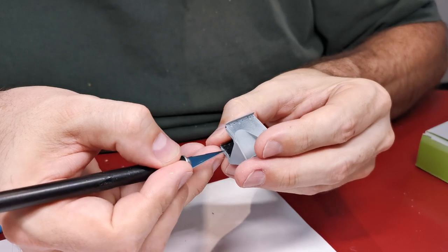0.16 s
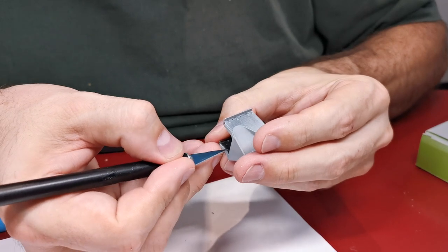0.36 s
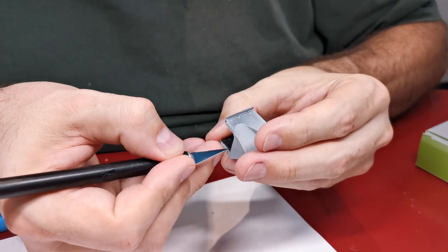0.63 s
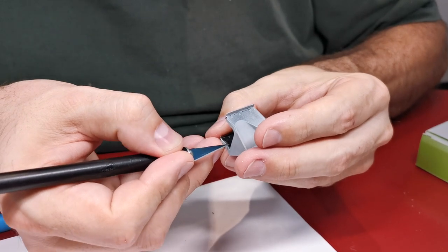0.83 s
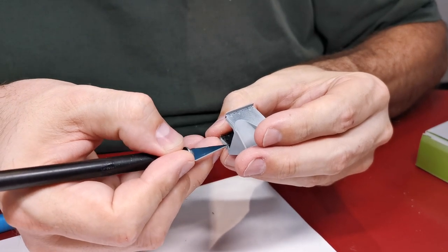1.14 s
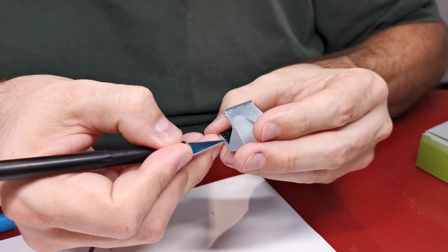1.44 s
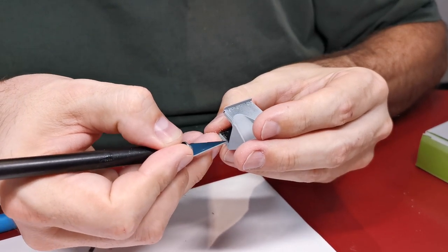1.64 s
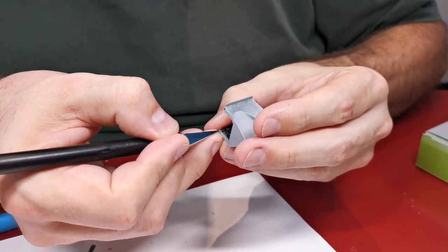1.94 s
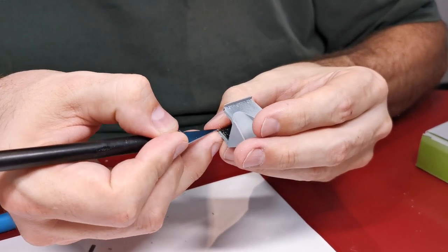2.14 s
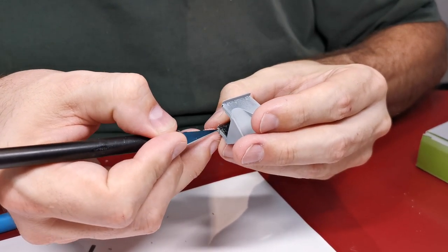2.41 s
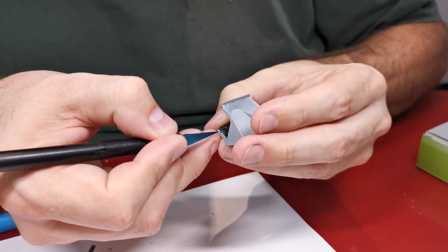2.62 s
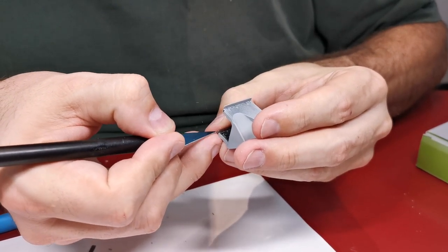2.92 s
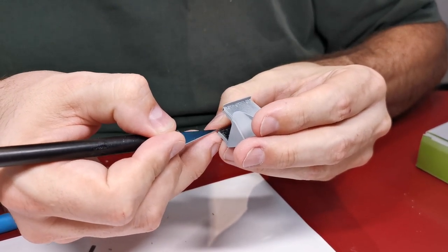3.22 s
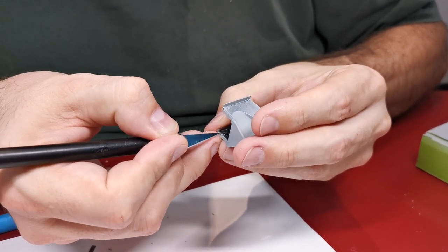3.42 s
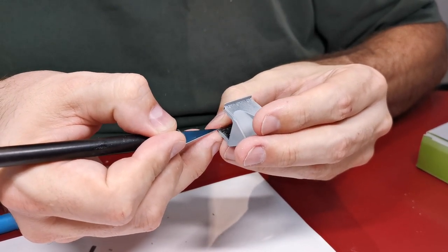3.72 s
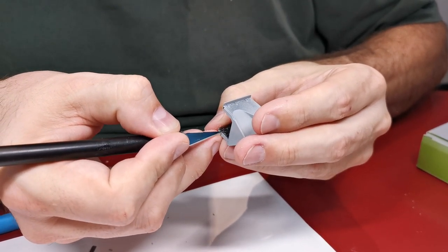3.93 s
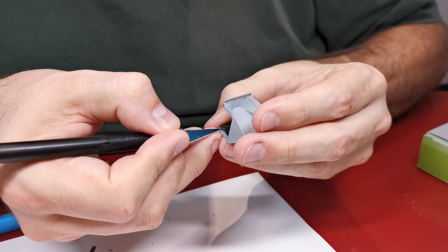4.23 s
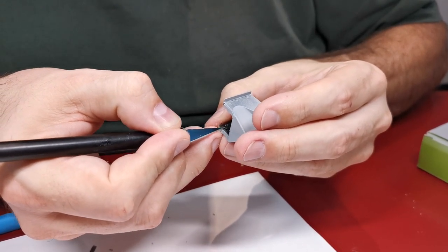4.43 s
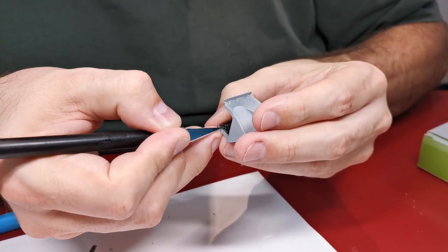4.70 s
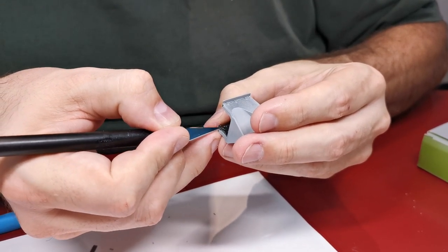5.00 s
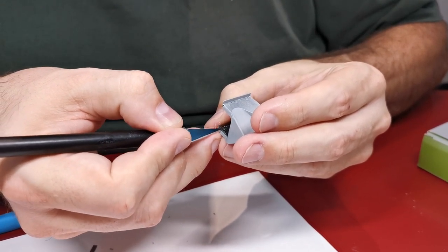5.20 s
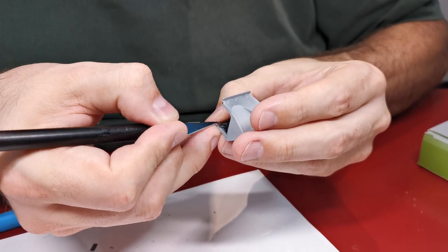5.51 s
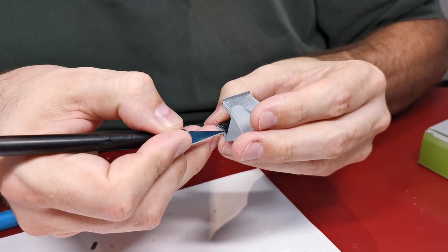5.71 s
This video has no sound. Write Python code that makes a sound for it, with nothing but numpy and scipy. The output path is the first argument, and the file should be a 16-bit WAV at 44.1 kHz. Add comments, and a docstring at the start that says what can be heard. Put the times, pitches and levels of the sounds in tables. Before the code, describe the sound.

Quick dry rasps and clicks of a blade catching along a plastic edge, with short pauses, over soft rumble and faint hiss.

```python
"""Knife scraping a plastic part

A hobby knife scrapes the edge of a small plastic part in quick strokes, close to the left microphone.
In each stroke the blade sticks and slips at a nearly even pace: noisy snaps with short chatter ring the
resonances of part and blade, clumps of tiny tears rasp in between, and the last slip knocks hardest.
Single contacts, some alone and some at the edge of a stroke, add a ring of the knife and a dull push.
Decaying noise tails make a small live room, over soft rumble, hiss and a faint mains hum of sines."""
import sys
import numpy as np
from scipy import signal
from scipy.fft import rfft, irfft, next_fast_len
from scipy.io import wavfile
from scipy.ndimage import map_coordinates

SR = 44100
rng = np.random.default_rng(int(sys.argv[2]) if len(sys.argv) > 2 else 0)


def transcribe(u):
    """Save the signal u as a 16-bit wav file named by the first command-line argument.

    u: samples, shape (n,) or (channels, n), limited to [-1, 1]; the rate is SR.
    q: integer samples, one column per channel.
    """
    v = np.clip(np.atleast_2d(u).T, -1, 1)
    q = np.round(v * 32767).astype(np.int16)
    wavfile.write(sys.argv[1], SR, q)


N = 258062
TIME = np.arange(N) / SR
TOP_HZ = 15900
SLIP_SIZE = 1024  # samples held for one contact

# Room air, relative spectrum: freq_hz, density_db
AIR_SPECTRUM = [(25, -1.5), (60, 0), (130, -2), (160, -3.5), (220, 0.5), (400, -7), (700, -13),
                (1200, -15.5), (2000, -16.5), (3200, -23), (5500, -24.5), (7800, -29.5), (9500, -42),
                (15000, -44)]
# Left-right correlation of the room air: freq_hz, correlation (0 to 1)
AIR_CORRELATION = [(30, 0.23), (120, 0.53), (300, 0.72), (800, 0.58), (4000, 0.11)]
# Swells of the low rumble: centre_s, half_width_s (to 1/e), rise_db
RUMBLE_SWELLS = [(0, .05, 7), (.31, .13, 7), (.63, .07, 5), (1.4, .2, 4.5), (2.46, .26, 7), (3.6, .12, 5),
                 (3.92, .08, 3)]
# Mains hum partials before the stereo tilt: freq_hz, level_db
HUM_PARTIALS = [(120, -78.5), (240, -91), (360, -92)]

# Strokes that bite, slip along the edge and drop away; one that stalls and bites again has two rows.
# Relative levels: start_s, end_s, nominal_slips_per_s, bite_db, slips_db, drop_db, chatter_re_snap_db,
# shavings_db, low_resonance_weight_db, base_contact_pitch_hz, knock_db
STROKES = [ (0.0352, 0.0849, 100, -20, -21.5, -24, -7.5, -34, 2.5, 7200, -49),
           (0.4516, 0.4652, 147, -24, -17.5, -22, -10, -34, -4.5, 7100, -56),
           (0.6895, 0.7583, 72, -20.5, -21.3, -25.5, -2, -38.5, -1.5, 7150, -53),
           (0.9876, 0.9958, 240, -26, -23.5, -25.5, -2, -37, 1, 6750, -54),
           (1.0135, 1.0452, 95, -26, -24.5, -23, -3.5, -39, 3, 6500, -40),
           (1.2197, 1.2345, 68, -27.5, -27, -22.5, -2, -39, 2, 7200, -52),
           (1.2525, 1.2835, 97, -27, -23.5, -24, -3, -36, -1.5, 7000, -35.5),
           (1.4826, 1.505, 140, -21.5, -30, -33, -1, -30.5, -4.5, 7000, -46),
           (1.5228, 1.549, 76, -25.5, -29, -26.5, -4, -32, -1, 6750, -38),
           (1.7042, 1.7135, 215, -30, -28, -27, 0, -33, -4, 7100, -54),
           (1.725, 1.7381, 230, -27.5, -30, -31, 0, -36, -3.5, 7050, -52),
           (1.7572, 1.7801, 87, -27, -42, -28.5, -2, -37, -1, 6650, -43),
           (1.9258, 1.9698, 136, -23.5, -30, -25, -3, -36.5, -1, 6700, -39),
           (2.1413, 2.1552, 70, -32, -32, -28, -6, -34.5, 3, 7000, -35),
           (2.912, 2.9175, 180, -27, -27, -25.5, -9, -39, -2, 6350, -41),
           (3.2389, 3.2548, 125, -27, -26, -23.5, -7, -38, -4, 6700, -53),
           (3.7045, 3.7205, 125, -30, -22, -21.5, -5.5, -37, -3.5, 6950, -51),
           (3.7315, 3.7387, 139, -21, -25, -26, -8, -35, -1, 6450, -49),
           (4.0322, 4.0466, 70, -30, -30, -25, -6, -45, -1.5, 6950, -50),
           (4.2853, 4.318, 120, -29, -34.5, -35, -5, -35, 1.5, 6400, -48),
           (4.54, 4.5425, 400, -32, -32, -33, -6, -34, 6, 6650, -60),
           (4.5665, 4.5881, 92, -26.5, -26, -33, -5, -38, -7, 6850, -56),
           (4.7635, 4.7725, 220, -40, -30.5, -30, -5, -41, 1, 6450, -60),
           (4.794, 4.8232, 170, -32, -29.5, -26.5, -4, -38, 1, 6100, -46),
           (5.0384, 5.0425, 245, -27, -27, -27.5, -2, -37, 0, 6300, -54),
           (5.0554, 5.079, 127, -33, -32.5, -24.5, -7, -36.5, 5, 5750, -48),
           (5.2802, 5.2862, 165, -25.5, -32, -32, 0, -35, 1, 6850, -46),
           (5.302, 5.3223, 148, -33, -33, -32, -2, -34.5, 5, 6700, -37),
           (5.4864, 5.519, 153, -21, -30.5, -35, -6, -34.5, 2, 6400, -37)]
# Single contacts, some alone and some at the edge of a stroke, relative levels:
# start_s, snap_db, low_resonance_weight_db, contact_pitch_hz, knock_db
SINGLE_CONTACTS = [(0.477, -30, 4, 7100, -50), (0.7624, -21, -1, 5700, -42), (1.2143, -32.5, 2, 6200, -58),
                   (2.6172, -37, -1, 7000, -66), (2.8758, -16.3, -9, 7100, -39.5),
                   (2.9073, -22, -1, 6850, -44), (2.9835, -34.5, -2, 6000, -62),
                   (3.672, -22.5, -1.5, 7250, -62), (3.9813, -15.5, -7, 7150, -44),
                   (4.2681, -25.5, -3.5, 6950, -53), (4.5212, -25.7, -.5, 6700, -60),
                   (5.4535, -35.5, 9, 6600, -44), (5.482, -30.5, 9, 6600, -54), (5.564, -35, -1, 6200, -56)]
# Resonances of part and blade at neutral grip: freq_hz, width_hz, lift_db
RESONANCES = [(1280, 320, 4), (1845, 330, 6.5), (2704, 344, 3.5), (3365, 310, 6), (4120, 350, 2.5),
              (5310, 340, 5), (5950, 250, 4), (6630, 330, 1), (7150, 220, 2.5), (7630, 200, 2),
              (8040, 270, 1)]
# Broad colour of a slip: freq_hz, relative_db
SCRAPE_COLOUR = [(100, -47), (800, -39), (1300, -30.5), (2050, -18.3), (2600, -7), (4600, -7), (6200, -3.5),
                 (7700, -1), (8700, -7.5), (9500, -17), (10300, -27.5), (11500, -24), (13600, -26),
                 (15200, -37.5)]
# Lowest modes of the part, damped by the fingers, before random spread: freq_hz, relative_db, t60_s
PART_MODES = [(900, -30, .008), (1292, -5.5, 0.014), (1500, -9, .01), (1844, 1, .013)]

# Direct sound, stereo balance: freq_hz, left_minus_right_db
DIRECT_BALANCE = [(700, 9.5), (1250, 1.5), (1850, -4.5), (2500, 14.5), (4000, 17.5), (5200, 8.5),
                  (7000, 12), (7900, 4.5), (8700, 6.5), (10500, 2.5), (15000, 0.5)]
# Phase offset between the two microphone ports: freq_hz, left_lead_rad
PORT_PHASE = [(1000, 0.94), (2200, 0.05), (3400, -0.55), (4100, 2.27), (5200, 1.7), (5800, -0.9),
              (6400, -0.8), (7900, -.5), (8600, 1.6), (9800, 2.5), (11000, 3), (11800, 0.5), (12900, -1.5),
              (14000, -1)]
# Shading of the right microphone by the moving hands: time_s, gain_db
HAND_SHADE = [(0, -.5), (.45, .5), (.75, -1.3), (1.25, -1), (1.5, 2), (2.15, 3.3), (2.9, 2.5), (3.25, -2.5),
              (3.7, -1.7), (4, 1.5), (4.3, 1), (4.55, -1.5), (4.8, -3.8), (5.5, -2.3)]
# Decay of the room tail: freq_hz, t60_s
ROOM_T60 = [(300, 0.05), (1000, 0.5157), (2600, 0.5059), (5500, 0.54), (7500, 0.4371), (13000, 0.42)]
# Tone of the room tail: freq_hz, relative_db
ROOM_COLOUR = [(500, -3.5), (1500, 2.5), (2200, 1.5), (3300, -5.5), (4700, 0), (5900, -2.5), (7000, -4.8),
               (8300, -2.8), (12000, -2.5)]
# Room tail, stereo balance: freq_hz, left_minus_right_db
ROOM_BALANCE = [(1000, -0.5), (1800, 3), (2500, 6.5), (6000, 11), (7300, 4), (8200, 1), (13000, 3.5)]

# How the slips of one stroke differ (standard deviations)
SLIP_JITTER_S, SLIP_SPREAD_DB, WEIGHT_SPREAD_DB = .0005, 1.5, 1.5
# The contact falls in pitch along the stroke, then sits lower as the blade drops off
CONTACT_SAG_HZ, DROP_SAG_HZ = 200, 450
KNOCK_RISE_DB = 13  # knocks grow as the blade nears the end of the edge
RUN_IN_S, RUN_OUT_S = .002, .005  # the edge drags just before the bite and just after the drop
SINGLE_FOCUS_DB, SLIP_FOCUS_DB = 6.5, 5  # lift of the contact resonance
SINGLE_CHATTER_DB = -11  # relative to the snap: a single contact chatters little
HARD_SNAP_DB = -16  # snap level of a hard single contact
KNIFE_HZ, RING_DB, THUD_DB = 2680, -20.5, -14.5  # ring and push amplitude at that hardness
RING_GROWTH, THUD_GROWTH = 1.8, 2.4  # dB of ring and of thud per dB of snap


def amp(db):
    """Decibels to gain."""
    return 10 ** (np.asarray(db) / 20)


def unit(x):
    """Scale to rms 1."""
    return x / np.sqrt(np.mean(x ** 2) + 1e-20)


def along(points, hz):
    """Read a (freq_hz, value) curve on a log frequency axis."""
    freqs, values = np.transpose(points)
    return np.interp(np.log(hz + 1), np.log(freqs), values)


def wobble(rate):
    """A smooth random curve with rate knots a second."""
    knots = rng.standard_normal(int(N * rate / SR) + 4)
    return map_coordinates(knots, [TIME * rate])


def filtered(x, response):
    """Multiply the spectrum of x by a response of frequency."""
    size = 2 * next_fast_len(N // 2 + SR // 4)
    hz = np.fft.rfftfreq(size, 1 / SR)
    return irfft(rfft(x, size) * response(hz), size)[..., :N]


def causal(db):
    """Minimum-phase response with these gains, so it rings only after its cause."""
    cepstrum = irfft(db * np.log(10) / 20)
    half = cepstrum.shape[-1] // 2
    cepstrum[..., 1:half] *= 2
    cepstrum[..., half + 1:] = 0
    return np.exp(rfft(cepstrum))


def ports(balance, hz):
    """Left and right gains in dB that keep the mean power."""
    ratio = amp(along(balance, hz)) ** 2
    powers = 2 * np.array([ratio, np.ones_like(ratio)]) / (1 + ratio)
    return 10 * np.log10(powers)


def ring(hz, t60, attack_s=0.00046):
    """One struck mode: a sine with a quick attack, dying away exponentially."""
    t = np.arange(SLIP_SIZE) / SR
    decay = np.exp(-np.log(1000) * t / t60)
    return np.sin(2 * np.pi * hz * t) * decay * (1 - np.exp(-t / attack_s))


def part(hz, weight_db, contact_hz=6700, grip=1, body_hz=3350, body_octaves=.62,
         contact_width_hz=900, contact_db=5):
    """Part and blade at unit power: grip shifts their resonances, the contact adds a broad one."""
    octaves = np.log2((hz + 1) / body_hz)
    db = along(SCRAPE_COLOUR, hz) + weight_db * np.exp(-(octaves / body_octaves) ** 4)
    db = db + contact_db * np.exp(-((hz - contact_hz) / contact_width_hz) ** 2)
    for centre, width, lift in RESONANCES:
        db = db + lift / (1 + (2 * (hz - centre * grip) / width) ** 2)
    response = causal(db)
    return response / np.sqrt(np.mean(abs(response) ** 2, axis=-1, keepdims=True))


def background(hiss_db=-74, rumble_db=-72.5, sway_db=1.2, split_hz=560):
    """Noise of partly correlated sides: steady hiss above, swaying rumble and hum below."""
    def mid_side(hz):
        turn = np.arccos(np.clip(along(AIR_CORRELATION, hz), -1, 1)) / 2
        return amp(along(AIR_SPECTRUM, hz)) * [np.cos(turn), np.sin(turn)]

    mid, side = filtered(rng.standard_normal((2, N)), mid_side)
    air = np.array([mid + side, mid - side])
    low = filtered(air, lambda hz: 1 / (1 + (hz / split_hz) ** 4))
    swell_db = sum(db * np.exp(-((TIME - s) / width) ** 2) for s, width, db in RUMBLE_SWELLS)
    rumble = unit(low) * amp(rumble_db + swell_db + sway_db * wobble(9))
    tilt = amp([[-.7], [.7]])  # dB, left and right
    return tilt * (rumble + mains()) + amp(hiss_db) * unit(air - low)


def mains(waver_db=1.8):
    """Faint hum: sine partials, each slowly wavering in level."""
    hum = 0
    for hz, db in HUM_PARTIALS:
        level = amp(db + waver_db * wobble(3)) * np.sqrt(2)  # rms to peak
        hum = hum + level * np.sin(2 * np.pi * hz * TIME)
    return hum


def stick_slip():
    """The blade grips and lets go at a nearly even pace, bite to drop.

    Rows: time_s, snap_db, chatter_re_snap_db, weight_db, contact_hz, focus_db, knock_db.
    """
    rows = []
    for (start, end, pace, bite_db, slip_db, drop_db, chatter_db, _,
         weight_db, contact_hz, knock_db) in STROKES:
        late, louder, heavier = rng.standard_normal(size=(3, 16))
        steps = int(np.clip(round((end - start) * pace), 1, len(late)))
        rows.append((start, bite_db, chatter_db, weight_db, contact_hz + CONTACT_SAG_HZ / 2,
                     SLIP_FOCUS_DB, knock_db - KNOCK_RISE_DB))
        for k in range(1, steps):
            way = k / steps  # 0 at the bite, 1 at the drop
            time_s = start + way * (end - start) + SLIP_JITTER_S * late[k]
            rows.append((time_s, slip_db + SLIP_SPREAD_DB * louder[k], chatter_db,
                         weight_db + WEIGHT_SPREAD_DB * heavier[k],
                         contact_hz + CONTACT_SAG_HZ * (.5 - way),
                         SLIP_FOCUS_DB, knock_db - KNOCK_RISE_DB * (1 - way)))
        rows.append((end, drop_db, chatter_db, weight_db, contact_hz - DROP_SAG_HZ,
                     SLIP_FOCUS_DB, knock_db))
    return rows


def snaps(contacts, grit=.42, fade_in_s=.00022, snap_s=0.00055, chatter_s=.0022,
          chatter_rise_s=0.0017, grip_spread=.012, snap_db=-3, chatter_db=-3):
    """Each slip or single contact is a sharp noisy snap, then milliseconds of chatter."""
    lead = SR // 1000  # room for the noise to fade in ahead of the peak
    hz = np.fft.rfftfreq(SLIP_SIZE, 1 / SR)
    t = (np.arange(SLIP_SIZE) - lead) / SR
    before, after = np.maximum(-t, 0), np.maximum(t, 0)
    grit_fade = np.exp(-before / fade_in_s - after / snap_s)
    chatter_fade = (1 - np.exp(-(after / chatter_rise_s) ** 2)) * np.exp(-after / chatter_s)
    snap_samples = .002 * SR  # levels are referred to 2 ms of sound
    out = np.zeros(N + SR)
    for s, db, rasp_db, weight_db, contact_hz, focus_db, _ in contacts:
        grip = 1 + grip_spread * rng.standard_normal()
        body = part(hz, weight_db, contact_hz, grip, contact_db=focus_db)
        burst = (t == 0) + grit * rng.standard_normal(SLIP_SIZE) * grit_fade
        chatter = rng.standard_normal(SLIP_SIZE) ** 3 * chatter_fade  # cubed: sparse, spiky noise
        snap = irfft(rfft(burst) * body)
        rasp = irfft(rfft(chatter) * body)
        sound = amp(snap_db) * snap / np.linalg.norm(snap)
        sound = sound + amp(rasp_db + chatter_db) * rasp / np.linalg.norm(rasp)
        out[round(s * SR) - lead:][:SLIP_SIZE] += amp(db) * np.sqrt(snap_samples) * sound
    return out[:N]


def shaving(tears_per_s=2500, size_spread_db=4, clump_db=4, weight_db=1, level_db=-7, ramp_s=.0011):
    """While the edge drags, tiny tears come in clumps and excite the resonances of part and blade."""
    pressure = 0
    for start, end, *_, shavings_db, _, _, _ in STROKES:
        to_edge_s = np.minimum(TIME - start + RUN_IN_S, end + RUN_OUT_S - TIME)
        pressure = pressure + amp(shavings_db) * np.clip(to_edge_s / ramp_s, 0, 1)
    sizes = amp(size_spread_db * rng.standard_normal(N) + clump_db * wobble(300))
    torn = rng.random(N) < tears_per_s / SR
    tears = torn * sizes * rng.choice([-1, 1], N)
    return amp(level_db) * filtered(unit(tears) * pressure, lambda hz: part(hz, weight_db))


def knocks(contacts, level_db=-1, pitch_spread=.025):
    """Every contact briefly rings the part's lowest modes, which move with the grip."""
    out = np.zeros(N + SR)
    for s, *_, knock_db in contacts:
        modes = 0
        for hz, level, t60 in PART_MODES:
            gain = amp(level + rng.normal(0, 1.5))
            modes = modes + gain * ring(hz * rng.normal(1, pitch_spread), t60)
        out[round(s * SR):][:SLIP_SIZE] += amp(knock_db + level_db) * modes
    return out[:N]


def nearby(x, scatter_s=.0012, left_db=-14, right_db=-8, delay_s=.0125, echo_db=-21):
    """The hands scatter sound differently to each microphone; a near surface sends one weak echo."""
    t = np.arange(SLIP_SIZE) / SR
    scatter = rng.standard_normal((2, SLIP_SIZE)) * t * np.exp(-t / scatter_s)
    scatter = scatter / np.linalg.norm(scatter, axis=1, keepdims=True)
    paths = amp([[left_db], [right_db]]) * scatter
    paths[:, round(delay_s * SR)] += amp(echo_db)
    return signal.fftconvolve(x, paths, axes=1)[:, :N]


def room(x, build_s=0.0037, wet_db=-6.5):
    """A diffuse noise tail decays at its own rate in each band, redrawn every quarter second."""
    out = np.zeros((2, N + SR))
    size = SR // 4
    for start in range(0, N, size):
        hz, t, z = signal.stft(rng.standard_normal((2, SR * 2 // 3)), SR, nperseg=256)
        fade = amp(-60 * t / along(ROOM_T60, hz)[:, None])
        build = 1 - np.exp(-(t / build_s) ** 2)
        tail = signal.istft(z * fade * build, SR, nperseg=256)[1]
        tail = tail / np.linalg.norm(tail[0])
        wet = signal.fftconvolve(x[None, start:start + size], tail, axes=1)
        out[:, start:start + wet.shape[1]] += wet
    return amp(wet_db) * filtered(
        out[:, :N], lambda hz: amp(along(ROOM_COLOUR, hz) + ports(ROOM_BALANCE, hz)))


def single_contacts():
    """Contacts alone or at the edge of a stroke: one snap with little chatter, in the columns of a slip."""
    return [(s, db, SINGLE_CHATTER_DB, weight_db, contact_hz, SINGLE_FOCUS_DB, knock_db)
            for s, db, weight_db, contact_hz, knock_db in SINGLE_CONTACTS]


def landings(t60=.008, low_hz=70, high_hz=1500):
    """The harder a single contact, the more it rings the knife and dully pushes the hand-held part."""
    knife, push = np.zeros(N + SR), np.zeros(N)
    for s, db, *_ in SINGLE_CONTACTS:
        at = round(s * SR)
        force_db = db - HARD_SNAP_DB
        knife[at:][:SLIP_SIZE] += amp(RING_DB + RING_GROWTH * force_db) * ring(KNIFE_HZ, t60)
        push[at] = amp(THUD_DB + THUD_GROWTH * force_db)
    dull = signal.butter(2, [low_hz, high_hz], "band", fs=SR, output="sos")
    return knife[:N] + signal.sosfilt(dull, push)


def scene():
    """The scraping reaches both microphones directly, off nearby things and through the room."""
    contacts = single_contacts() + stick_slip()
    knife = snaps(contacts) + shaving() + knocks(contacts) + landings()

    def microphones(hz):
        lag = np.exp(-1j * np.outer([0, 1], along(PORT_PHASE, hz)))  # right lags left
        return causal(ports(DIRECT_BALANCE, hz)) * lag

    direct = filtered(knife, microphones)
    heard = direct + nearby(direct) + room(knife)
    heard[1] *= amp(np.interp(TIME, *np.transpose(HAND_SHADE)))
    return heard + background()


def record(dry):
    """The recorder keeps nothing above its band limit, reached over a 400 Hz slope."""
    return filtered(dry, lambda hz: np.clip((TOP_HZ - hz) / 400 + .5, 0, 1))


dry = scene()
out = record(dry)
transcribe(out)
```